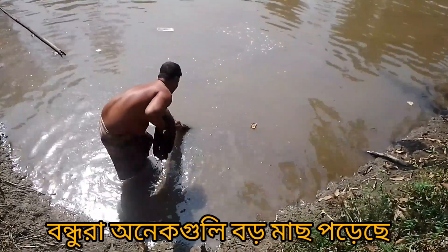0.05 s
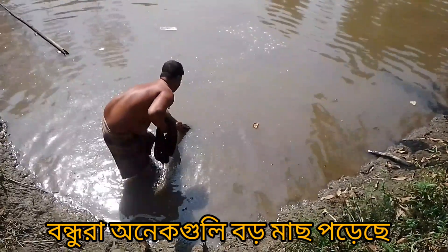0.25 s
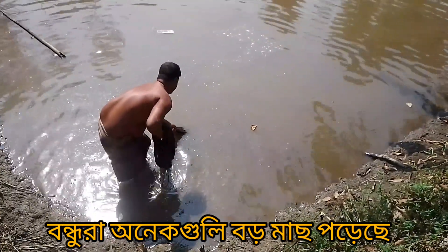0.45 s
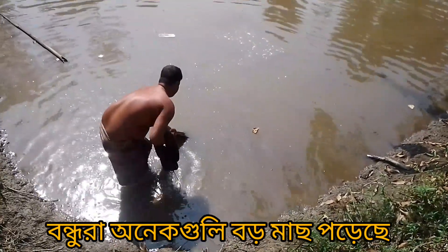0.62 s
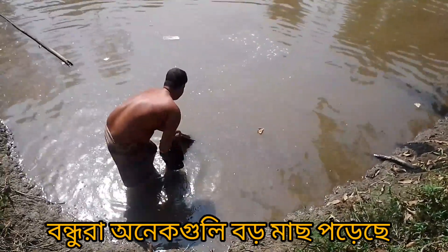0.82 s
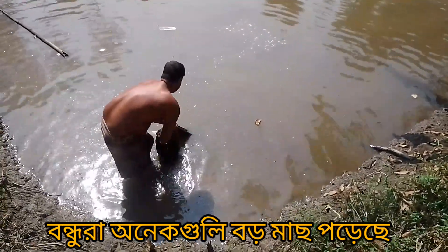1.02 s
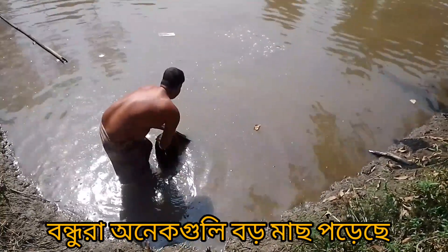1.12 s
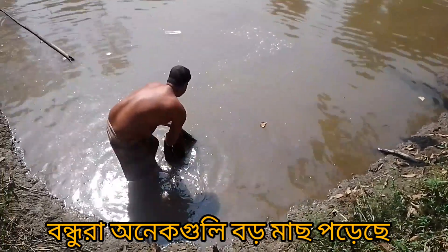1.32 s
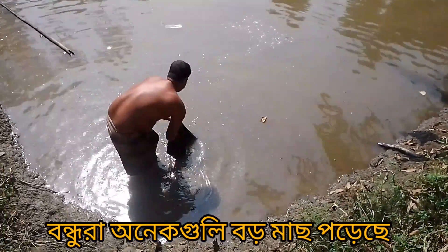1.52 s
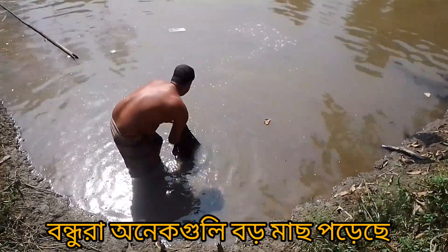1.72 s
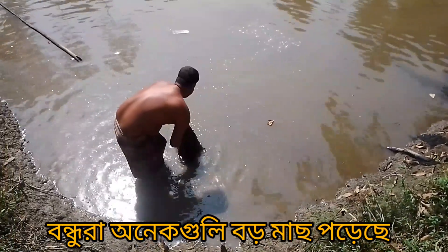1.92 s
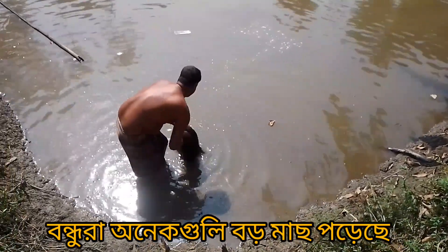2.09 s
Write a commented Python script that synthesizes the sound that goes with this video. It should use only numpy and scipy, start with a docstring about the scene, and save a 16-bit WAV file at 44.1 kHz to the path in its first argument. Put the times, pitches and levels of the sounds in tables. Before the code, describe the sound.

Fine bright droplets spatter off a lifted net onto pond water in two irregular bursts, with tiny plops and thin trickle between, then a faint swish and sparse ticks. Open air, microphone on the bank, very little echo.

```python
"""Short showers of fine droplets fall from a wet fishing net gathered out of a shallow pond, heard from the bank.
Showers and trickle are random clicks that ring at their own pitch; single drops are sharp ticks with spatter.
Fat drops and swishes are shaped noise, bubbles are gliding tones, and soft sloshes are swells of noise.
The water is brightest around 8 kHz; a short scatter and faint outdoor air lie behind it."""
import sys
import numpy as np
from scipy import signal
from scipy.fft import rfft, irfft
from scipy.io import wavfile
from scipy.ndimage import uniform_filter1d

SR = 44100
rng = np.random.default_rng(int(sys.argv[2]) if len(sys.argv) > 2 else 0)


def put_to_file(sound):
    """Save the sound as 16-bit audio at rate SR, in the file named by the first command-line argument."""
    columns = np.atleast_2d(sound).T  # one column per channel
    safe = np.clip(columns, -1, 1)
    whole_steps = np.round(safe * 32767)
    wavfile.write(sys.argv[1], SR, whole_steps.astype(np.int16))


N = 94815
TIME = np.arange(N) / SR  # seconds


def amp(db):
    """Turns decibels into gain."""
    return 10 ** (np.asarray(db) / 20)


def unit(x):
    """Scales a signal to an rms of 1."""
    return x / np.sqrt(np.mean(x ** 2) + 1e-20)


def add(mix, start_s, sound):
    """Mixes a sound in at its start time, cut off where the mix ends."""
    part = mix[max(round(start_s * SR), 0):][:len(sound)]
    part += sound[:len(part)]


def read(points, hz):
    """Reads a spectrum in dB, joining its points along a log-frequency axis."""
    point_hz, db = np.transpose(points)
    return np.interp(np.log(hz + 1), np.log(point_hz + 1), db)


def bump(hz, centre_hz, octaves):
    """A bell of height 1 around a frequency."""
    return np.exp(-.5 * (np.log2((hz + 1) / centre_hz) / octaves) ** 2)


def smooth_noise(shape, smooth_s):
    """Slow random wandering with an rms of 1."""
    return unit(uniform_filter1d(rng.standard_normal(shape), round(smooth_s * SR)))


def band_noise(size, centre_hz, octaves):
    """Noise around one pitch, with an rms of 1."""
    hz = np.fft.rfftfreq(size, 1 / SR)
    return unit(irfft(rfft(rng.standard_normal(size)) * bump(hz, centre_hz, octaves), size))


def swell(middle_s, width_s):
    """A smooth rise and fall of level."""
    return np.exp(-.5 * ((TIME - middle_s) / width_s) ** 2)


FOCUS_OCTAVES, DROPLET_OCTAVES = 0.36, 0.021  # widths of the broad stress and of the narrow ring


def tick(colour, centre_hz=1, focus_db=0, ring_hz=1, ring_db=0, size=1024):
    """A click with a given spectrum, stressed around its centre, with an optional brief ring."""
    hz = np.fft.rfftfreq(size, 1 / SR)
    focus = focus_db * bump(hz, centre_hz, FOCUS_OCTAVES)
    ring = ring_db * bump(hz, ring_hz, DROPLET_OCTAVES)
    log_gain = np.log(amp(read(colour, hz) + focus + ring))
    circle = np.concatenate([log_gain, log_gain[::-1][1:-1]])
    # minimum phase: the click starts at once and then dies away
    return np.fft.ifft(np.exp(np.conj(signal.hilbert(circle)))).real


DROPLET_LOW_HZ, DROPLET_HIGH_HZ, DROPLET_RING_DB = 3800, 10360, 17
CLUMP_DB, CLUMP_S = 3.2, .004


def droplets(per_s, spread_db, colour, centre_hz=1, focus_db=0, count=16):
    """Random impacts, most tiny and a few large, swelling in clumps and ringing at various pitches; rms 1."""
    clumps = smooth_noise(N, CLUMP_S)
    size_db = spread_db * np.minimum(rng.exponential(1, N), 4) + CLUMP_DB * clumps
    sizes = amp(size_db) * rng.choice([-1, 1], N)
    kind = rng.integers(0, count, N)
    falls = rng.random(N) < per_s / SR
    out = np.zeros(N)
    for k, ring_hz in enumerate(np.geomspace(DROPLET_LOW_HZ, DROPLET_HIGH_HZ, count)):
        click = tick(colour, centre_hz, focus_db, ring_hz, DROPLET_RING_DB)
        out += signal.oaconvolve(sizes * (falls & (kind == k)), click)[:N]
    return unit(out)


# Showers off the net. Each row: start in seconds, hold in seconds, level in dB,
# release in dB per second, centre of the colour in Hz.
SHOWERS = [(0.052, 0.022, -53.5, 327, 8000), (0.185, 0.059, -48.5, 492, 8100),
           (0.203, 0.028, -35, 349, 7100), (0.816, 0.0053, -51, 140, 7400), (0.944, 0.087, -43, 194, 8340),
           (0.976, 0.033, -53.5, 602, 5300), (1.082, 0.024, -43.5, 422, 8500),
           (1.127, 0.041, -54.5, 58.5, 8100), (1.694, 0.006, -50, 450, 6500),
           (1.978, 0.0027, -69, 402, 7300)]
# How bright the spray is. Each row: frequency in Hz, relative level in dB.
SPRAY_COLOUR = [(100, -35), (500, -33), (1200, -25.5), (2500, -19.5), (3500, -17.5), (4700, -10),
                (6500, -9), (8200, -3), (10000, -15), (11000, -20.5), (13000, -25.5), (16000, -31.5)]
SHOWER_PER_S, SHOWER_SPREAD_DB, SHOWER_FOCUS_DB = 1500, 3, 8.5
SHOWER_ATTACK_S = .003


def showers():
    """Each movement of the net sheds a burst of droplets that holds, then fades."""
    out = np.zeros(N)
    for start, hold, db, release, hz in SHOWERS:
        t = TIME - start
        attack = np.clip(t / SHOWER_ATTACK_S, 0, 1)
        level = attack * amp(db - abs(release) * np.maximum(t - hold, 0))
        out += level * droplets(SHOWER_PER_S, SHOWER_SPREAD_DB, SPRAY_COLOUR, hz, SHOWER_FOCUS_DB)
    return out


# Single drops striking the pond. Each row: time in seconds, peak in dB, centre of the colour in Hz.
DROPS = [(0.065, -44, 9900), (0.1702, -46.5, 4800), (0.2094, -23, 8100), (0.2269, -16.5, 9220),
         (0.2293, -20, 7800), (0.2325, -17, 7200), (0.2608, -18.5, 7140), (0.2770, -22, 8940),
         (0.469, -33, 6080), (0.558, -40, 4700), (0.6904, -36.5, 6800), (0.7098, -38, 6050),
         (0.825, -38, 7040), (0.832, -32.5, 7900), (0.9529, -16.5, 6720), (1.008, -21.5, 7100),
         (1.0240, -21, 8200), (1.0792, -22, 4600), (1.0868, -27, 7800), (1.0922, -24, 7600),
         (1.0954, -23, 6700), (1.1050, -23.5, 7750), (1.1468, -23.5, 7630), (1.1748, -32.5, 7800),
         (1.189, -30.5, 7600), (1.2528, -36, 7630), (1.2888, -39, 7950), (1.2909, -33.5, 7800),
         (1.3569, -29, 5740), (1.5684, -28, 5460), (1.6498, -45.5, 8130), (1.696, -51, 7600),
         (1.7023, -50, 6700), (1.824, -47, 6570), (1.8594, -45.5, 6300), (1.964, -45.5, 6300),
         (1.9864, -43.5, 6900)]
# How bright a drop is. Each row: frequency in Hz, relative level in dB.
DROP_COLOUR = [(100, -43), (600, -34), (2000, -29), (3300, -17), (4700, -9.5), (6500, -6.5), (8200, 2),
               (9700, -7), (11500, -13.5), (16000, -30)]
DROP_FOCUS_DB, DROP_RING_DB = 10.5, 4.5
SPATTER_DB, SPATTER_S = -20.5, 0.002  # beside the first impact; fade time


def drops(size=512):
    """A sharp tick on the surface, followed by a few milliseconds of spatter."""
    out, t = np.zeros(N), np.arange(size) / SR
    for start, db, hz in DROPS:
        spatter = amp(SPATTER_DB) * np.exp(-t / SPATTER_S) * rng.standard_normal(size)
        impact = (t == 0) + spatter
        sound = signal.fftconvolve(impact, tick(DROP_COLOUR, hz, DROP_FOCUS_DB, hz, DROP_RING_DB))
        peak = abs(signal.hilbert(sound)).max()
        add(out, start, amp(db) * sound / peak)
    return out


SPLAT_S, SPLAT_OCTAVES = 0.0046, 0.57  # fade time, width of the noise


def splat(hz, db):
    """A torn patch of surface: a sudden, quickly dying burst of noise around one pitch."""
    t = TIME[:SR // 20]
    return amp(db) * band_noise(len(t), hz, SPLAT_OCTAVES) * np.exp(-t / SPLAT_S)


# Fat drops with a duller splat. Each row: start in seconds, level in dB before the fade, centre in Hz.
SPLATS = [(0.207, -69, 2100), (0.367, -55, 2900), (0.389, -56, 3520), (0.663, -61.5, 2900),
          (0.823, -59.5, 3130), (1.0916, -56.5, 1430), (1.0958, -47.5, 4000), (1.5685, -60.5, 2500),
          (1.704, -57.5, 3920), (1.986, -59, 4100)]


def splats():
    """Fat drops tear the surface as they land."""
    out = np.zeros(N)
    for start, db, hz in SPLATS:
        add(out, start, splat(hz, db))
    return out


BUBBLE_ATTACK_S = .0015
BUBBLE_WAVER_DB, BUBBLE_WAVER_S = 2.5, .004
BUBBLE_WOBBLE = .01  # random share of the pitch


def bubble(hz, db, length, rise=0):
    """An air pocket rings, wavering in level and pitch as it glides, and dies away."""
    t = np.arange(0, 2 * length, 1 / SR)
    age = t / length
    waver, wobble = smooth_noise((2, SR // 2), BUBBLE_WAVER_S)[:, :len(t)]
    attack = 1 - np.exp(-(t / BUBBLE_ATTACK_S) ** 2)
    level = attack * np.exp(-.5 * age - 2 * age ** 5)
    pitch = hz * (1 + rise * age + BUBBLE_WOBBLE * wobble)
    return amp(db + BUBBLE_WAVER_DB * waver) * level * np.sin(2 * np.pi * np.cumsum(pitch) / SR)


# Bubbles trapped by falling water. Each row: start in seconds, pitch in Hz, level in dB before waver and fade,
# length in seconds, pitch rise over that length as a share (negative falls).
BUBBLES = [(0.15, 914, -66.5, 0.033, -0.12), (0.15, 1210, -66.5, 0.012, -0.086),
           (0.295, 4030, -49, 0.0054, 0.01), (0.301, 4520, -48, 0.0047, 0.06),
           (0.335, 1865, -50, 0.0052, 0.07), (0.352, 2800, -52, 0.005, 0.07),
           (0.368, 2800, -51, 0.0045, 0.017), (0.3872, 3706, -42, 0.0078, 0.074),
           (0.403, 3800, -59.5, 0.014, 0.01), (0.411, 1117, -61, 0.015, -0.024),
           (0.435, 1000, -65, 0.01, -0.021), (0.495, 868, -62.5, 0.017, 0.026),
           (0.5, 1238, -60.5, 0.012, -0.16), (0.511, 940, -66, 0.022, 0.06),
           (0.539, 825, -56, 0.036, -0.01), (0.557, 1127, -64.5, 0.044, -0.067),
           (0.575, 890, -74, 0.021, 0), (0.587, 1047, -59, 0.032, 0.09), (0.79, 2430, -63, 0.009, -0.054),
           (1.994, 1392, -78, 0.039, 0)]
BUBBLE_SPLAT_DB = -16  # beside the bubble


def bubbles():
    """The larger plinks and plops, each born in a small splat."""
    out = np.zeros(N)
    for start, hz, db, length, rise in BUBBLES:
        add(out, start, bubble(hz, db, length, rise))
        add(out, start, splat(hz, db + BUBBLE_SPLAT_DB))
    return out


# Trickle from the mesh over time. Each row: time in seconds, level in dB.
TRICKLE = [(0, -69.5), (0.17, -72), (0.29, -66), (0.42, -59), (0.5, -62.5), (0.56, -55.5), (0.66, -62.5),
           (0.71, -60.5), (0.80, -64.5), (0.95, -56), (1.25, -94), (1.42, -73.5), (1.5, -72.5), (1.62, -76),
           (1.95, -77), (2.15, -68.5)]
# How bright the trickle is. Each row: frequency in Hz, relative level in dB.
TRICKLE_COLOUR = [(100, -38.5), (800, -26.5), (2000, -21), (3300, -23.5), (4700, -18.5), (6000, -13.5),
                  (7200, -7.5), (8100, -0.5), (9200, -15.5), (11000, -23), (16000, -30)]
TRICKLE_PER_S, TRICKLE_SPREAD_DB = 2400, 1.5
FIZZ_PER_S, FIZZ_LOW_HZ, FIZZ_HIGH_HZ, FIZZ_S = 660, 2900, 7520, .0018  # FIZZ_S: fade time
FIZZ_DB, FIZZ_TILT_DB, FIZZ_SPREAD_DB = -10, 12, 12  # base, gain towards high pitch, random loss


def trickle():
    """Fine dribble from the mesh, with tiny bubbles pinging through it."""
    water = droplets(TRICKLE_PER_S, TRICKLE_SPREAD_DB, TRICKLE_COLOUR)
    chance, pitch, depth = rng.random((3, N))
    t = TIME[:SR // 40]
    ring = (1 - np.exp(-t / BUBBLE_ATTACK_S)) * np.exp(-t / FIZZ_S)
    for i in np.flatnonzero(chance < FIZZ_PER_S / SR):
        hz = FIZZ_LOW_HZ * (FIZZ_HIGH_HZ / FIZZ_LOW_HZ) ** pitch[i]
        db = FIZZ_DB + FIZZ_TILT_DB * pitch[i] - FIZZ_SPREAD_DB * depth[i]
        add(water, TIME[i], amp(db) * ring / ring.max() * np.sin(2 * np.pi * hz * t))
    return water * amp(np.interp(TIME, *np.transpose(TRICKLE)))


# Wet mesh dragged through the surface. Each row: middle in seconds, width in seconds, level in dB.
SWISHES = [(1.494, 0.025, -62.5), (1.599, 0.038, -65.5)]
# How bright the swish is. Each row: frequency in Hz, relative level in dB.
SWISH_COLOUR = [(200, -13), (1000, 1), (2300, -7.5), (4000, -26), (8200, 11), (11000, -3), (15000, -6.5)]


def swishes():
    """Soft wide hiss as the mesh is drawn through the surface."""
    hiss = unit(signal.oaconvolve(rng.standard_normal(N), tick(SWISH_COLOUR))[:N])
    return hiss * sum(amp(db) * swell(middle, width) for middle, width, db in SWISHES)


# Soft sloshes of the pond. Each row: middle in seconds, width in seconds, level in dB, pitch in Hz.
SLOSHES = [(0.13, 0.19, -81.5, 730), (0.994, 0.029, -82, 332), (1.299, 0.014, -78.5, 273),
           (1.5, 0.027, -83, 1370), (1.595, 0.027, -79, 705), (1.617, 0.012, -76.5, 347)]
SLOSH_OCTAVES = 0.36


def sloshes():
    """Soft swells of stirred water, each a band of noise around its pitch."""
    out = np.zeros(N)
    for middle, width, db, pitch in SLOSHES:
        out += amp(db) * band_noise(N, pitch, SLOSH_OCTAVES) * swell(middle, width)
    return out


BANK_DB, BANK_T60_S = -10.5, 0.22  # T60: time to fade by 60 dB


def bank(x):
    """Short, weak scatter from the water and the bank: a fading tail of noise."""
    t = TIME[:SR // 2]
    tail = rng.standard_normal(len(t)) * amp(-60 * t / BANK_T60_S)
    return amp(BANK_DB) * signal.fftconvolve(x, tail / np.linalg.norm(tail))[:N]


# Colour of the outdoor air. Each row: frequency in Hz, relative level in dB.
AIR = [(20, -4), (60, -5.5), (100, -12.5), (150, -27), (220, -12.5), (330, -6), (600, -9.5), (1500, -13),
       (3500, -12.5), (6000, -14), (8100, -4), (10000, -14.5), (12500, -19), (16000, -17.5)]
AIR_DB, AIR_PATCHY_DB = -73, .7


def air():
    """Faint outdoor rumble and hiss, drifting in patches of time and pitch."""
    hz, _, z = signal.stft(rng.standard_normal(N), SR, nperseg=2048)
    patches = uniform_filter1d(rng.standard_normal(z.shape), size=14, axis=0)
    patches = unit(uniform_filter1d(patches, size=4, axis=1))
    z = z * amp(read(AIR, hz)[:, None] + AIR_PATCHY_DB * patches)
    return amp(AIR_DB) * unit(signal.istft(z, SR, nperseg=2048)[1][:N])


DROP_SCATTER_DB = -1  # how strongly single drops feed the scatter


def scene():
    """All the water, its scatter and the air."""
    water = showers() + splats() + bubbles() + trickle() + sloshes() + swishes()
    ticks = drops()
    scatter = bank(water + amp(DROP_SCATTER_DB) * ticks)
    return (water + ticks + scatter + air())[None]


OFFSET, CUTOFF_HZ = -.0002, 15800  # offset as a share of full scale


def record(dry):
    """Slight constant offset and band limit of the recorder."""
    low_pass = signal.firwin(301, CUTOFF_HZ, window=("kaiser", 8), fs=SR)
    return signal.oaconvolve(dry + OFFSET, low_pass[None], "same")


dry = scene()
out = record(dry)
put_to_file(out)
```